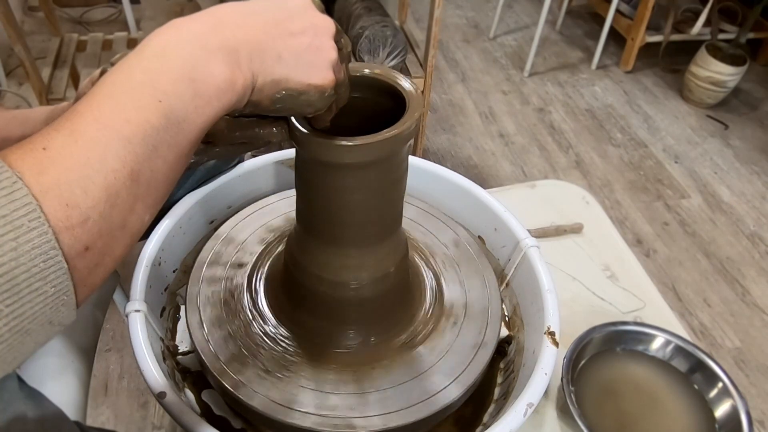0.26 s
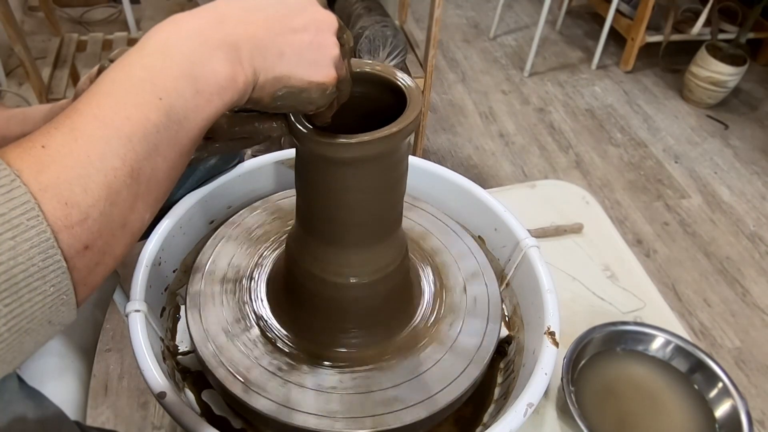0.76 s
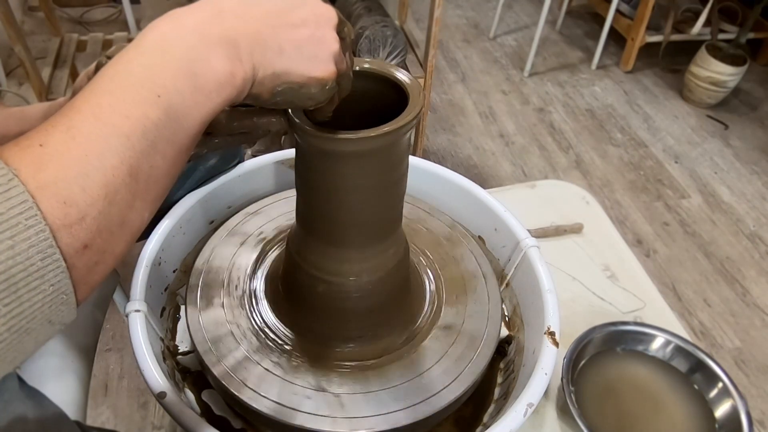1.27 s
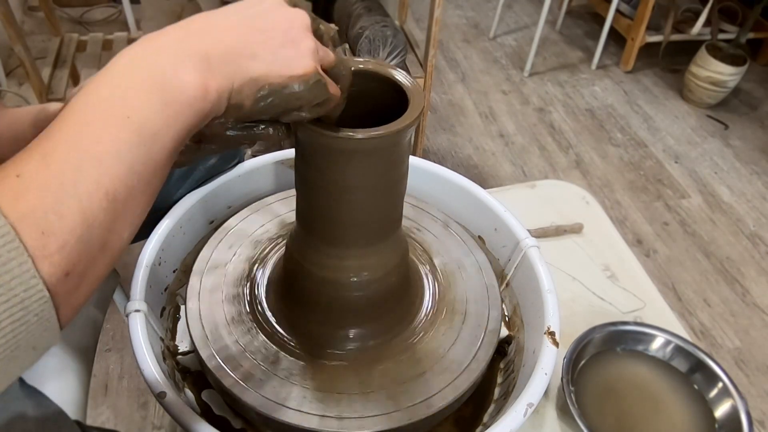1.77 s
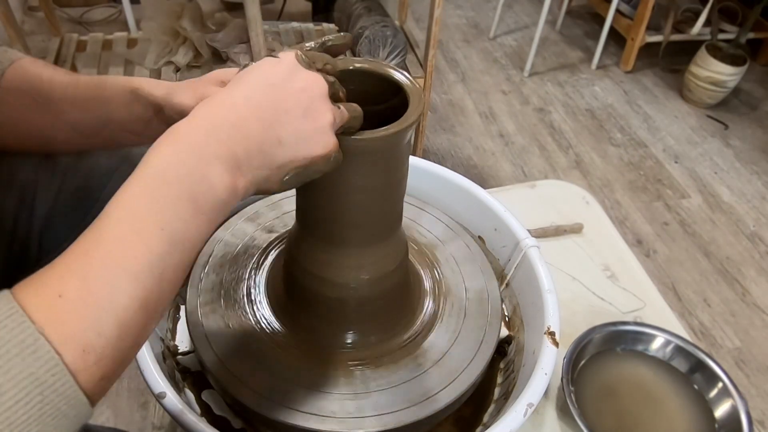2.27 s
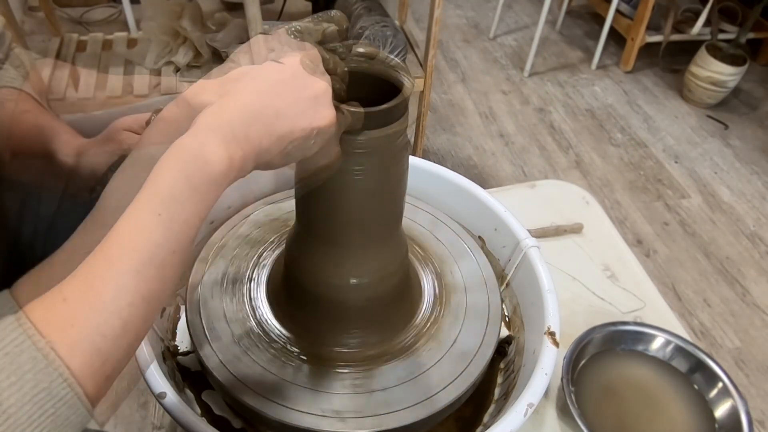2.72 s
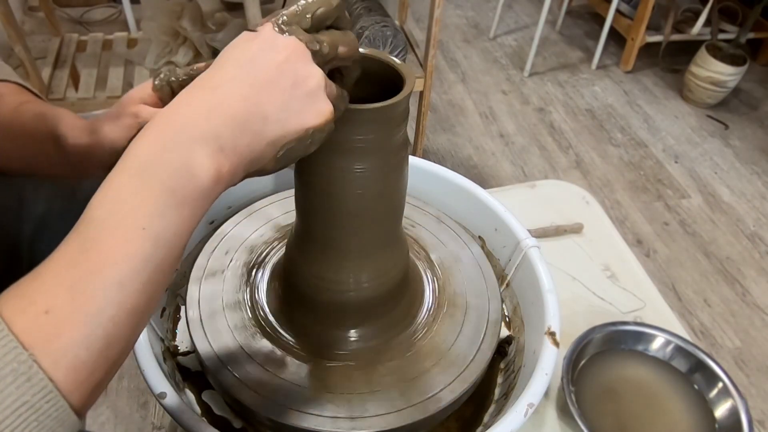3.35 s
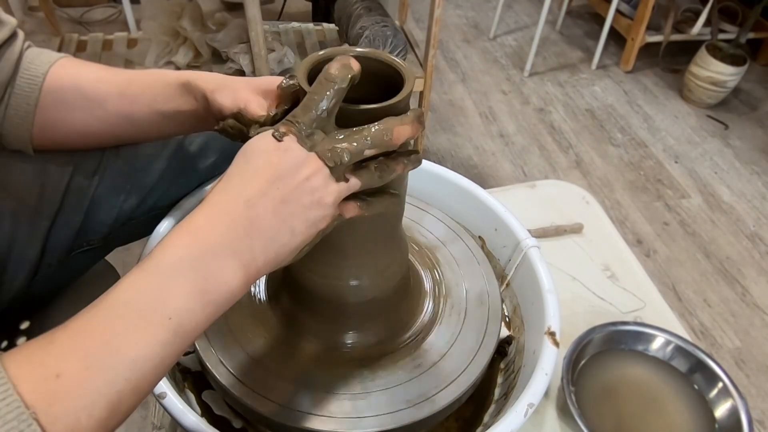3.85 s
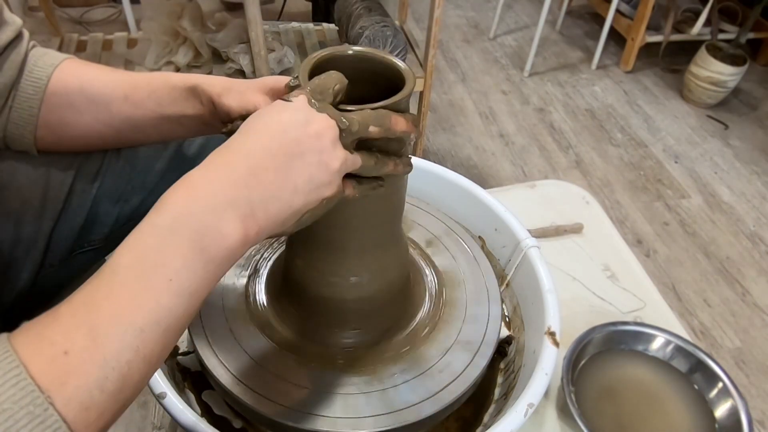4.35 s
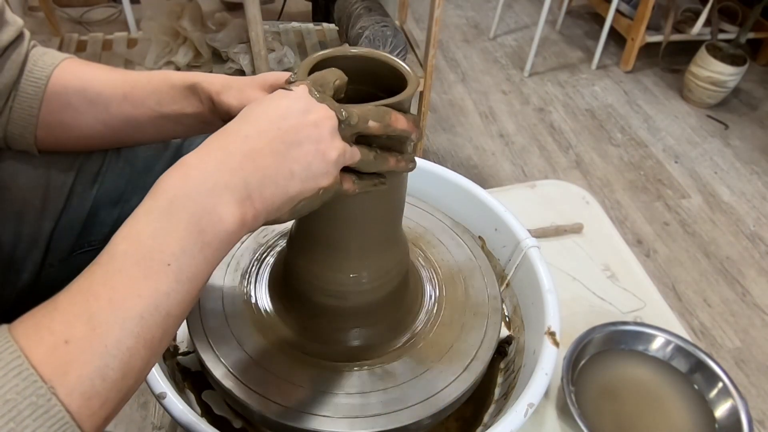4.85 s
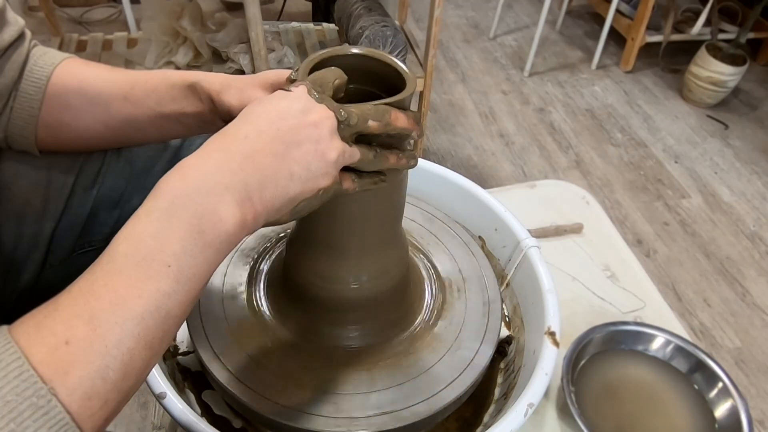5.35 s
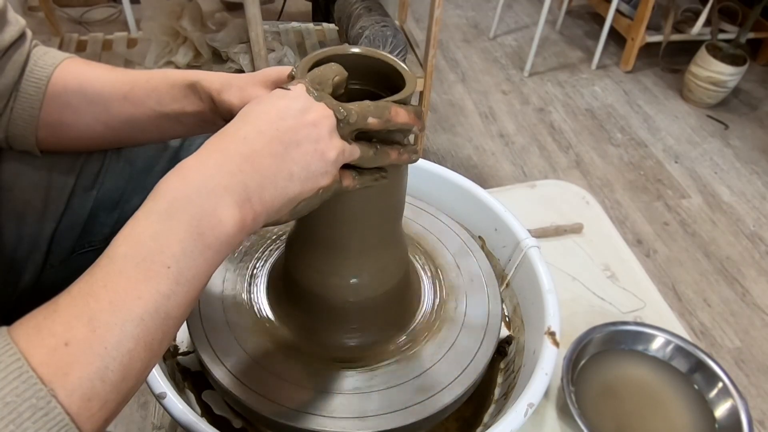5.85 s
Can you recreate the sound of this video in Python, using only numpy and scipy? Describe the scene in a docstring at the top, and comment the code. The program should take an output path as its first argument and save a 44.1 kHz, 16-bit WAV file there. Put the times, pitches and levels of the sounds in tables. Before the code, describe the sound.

An electric pottery wheel hums and rumbles low; a broad rush stops abruptly partway, leaving wet fingers softly squelching and sliding on clay.

```python
"""Electric pottery wheel in a workshop

The drive throbs, hums and whines as wavering tones; the controller whistles; noise through resonances rumbles.
Wet fingers slide and squelch on the clay, a sleeve brushes past, slip spatters: shaped bursts of coloured noise.
Partway through, a broad rush stops at once; throb and hum sound slightly higher and the tones rebalance."""
import sys
import numpy as np
from scipy import signal
from scipy.fft import rfft, irfft
from scipy.io import wavfile

SR = 44100
rng = np.random.default_rng(int(sys.argv[2]) if len(sys.argv) > 2 else 0)


def materialize(psi):
    """Save the field psi as 16-bit PCM at rate SR to the path in sys.argv[1].

    A 1-D psi becomes a single channel; in a 2-D psi each row is a channel.
    """
    bounded = np.clip(np.atleast_2d(psi).T, -1, 1)
    quanta = np.round(bounded * 32767).astype(np.int16)
    wavfile.write(sys.argv[1], SR, quanta)


N = 268569
TIME = np.arange(N) / SR
FREQS = np.maximum(np.arange(N // 2 + 1) * SR / N, 1)


def from_db(db):
    """Decibels to gain."""
    return 10 ** (np.asarray(db) / 20)


def rms_one(x):
    """Scale to unit power."""
    return x / np.sqrt(np.mean(np.abs(x) ** 2) + 1e-30)


def pan(db):
    """Channel gains for a level difference, left over right."""
    return from_db([[db / 2], [-db / 2]])


def colour(points):
    """Gain by frequency from (Hz, dB) rows, falling away past the ends."""
    hz, db = np.transpose(points)
    low_end = np.minimum(1, FREQS / hz[0]) ** 2
    high_end = np.minimum(1, hz[-1] / FREQS) ** 4
    return from_db(np.interp(np.log(FREQS), np.log(hz), db)) * low_end * high_end


def resonance(hz, width_hz, order=1):
    """Gain by frequency of a resonance, steeper with each order; unit power."""
    detuning = (FREQS ** 2 - hz ** 2) / (FREQS * width_hz * np.pi / 2)
    return rms_one(1 / (1 + detuning ** 2 / order) ** order)


def drift(rate_hz):
    """Random wander below a corner rate, rms 1."""
    lowpass = 1 / (1 + (FREQS / rate_hz) ** 4)
    return rms_one(irfft(rfft(rng.standard_normal(N)) * lowpass, N))


# Likeness of the two channels. Each row: frequency in Hz, correlation.
LIKENESS_BY_HZ = [(60, 0.91), (250, 0.99), (450, 0.93), (800, 0.27), (1600, 0.39), (2800, 0.53),
                  (4200, 0.57), (6000, 0), (9000, 0)]


def noise(gain):
    """Stereo noise of a given colour, alike in the bass and diffuse in the treble; rms 1."""
    hz, alike = np.transpose(LIKENESS_BY_HZ)
    alike = np.clip(np.interp(np.log(FREQS), np.log(hz), alike), -.99, .998)
    mid, side = rfft(rng.standard_normal((2, N))) * gain
    spectrum = np.sqrt(1 + alike) * mid + np.sqrt(1 - alike) * side * [[1], [-1]]
    return rms_one(irfft(spectrum, N))


def resonant_noise(spectrum, db, peaks):
    """Broad noise at a given level with resonances standing out of it."""
    ringing = sum((from_db(peak_db) * resonance(hz, width)) ** 2 for hz, width, peak_db in peaks)
    power = ringing + (from_db(db) * rms_one(colour(spectrum))) ** 2
    return np.sqrt(np.mean(power)) * noise(np.sqrt(power))


def tone(hz, unsteady, lead_rad=0):
    """A line of unit power whose strength and phase waver; the left channel leads."""
    phase = 2 * np.pi * (np.cumsum(hz * np.ones(N)) / SR + rng.random())
    waver = rms_one(1 + unsteady * (drift(2.8) + 1j * drift(2.85)))
    lead = np.exp(1j * lead_rad * np.array([[1], [0]]))
    return np.sqrt(2) * np.real(waver * np.exp(1j * phase) * lead)


def burst(start, rise_s, decay_s):
    """A quick swell that dies exponentially."""
    age = np.maximum(TIME - start, 0)
    return (1 - np.exp(-age / rise_s)) * np.exp(-age / decay_s)


def stroke(start, hold_s, attack_s, release_s, sag_db_per_s):
    """Swells tenfold over the attack before start, sags while held, falls tenfold over the release."""
    age = TIME - start
    outside = np.maximum(-age, 0) / attack_s + np.maximum(age - hold_s, 0) / release_s
    return from_db(-20 * outside - sag_db_per_s * np.clip(age, 0, hold_s))


GRIT_PER_S, GRIT_SPREAD_DB = 340, 3


def grit(gain):
    """Tiny catches of a rubbed surface as random coloured clicks; rms 1."""
    sizes = from_db(GRIT_SPREAD_DB * np.minimum(rng.exponential(1, N), 3))
    signed_sizes = sizes * rng.choice([-1, 1], N)
    catches = signed_sizes * (rng.random(N) < GRIT_PER_S / SR)
    return rms_one(irfft(rfft(catches) * gain, N))


# Colour of the rush. Each row: frequency in Hz, relative level in dB.
RUSH_COLOUR = [(120, -6), (250, 2), (400, -1), (560, -6), (880, -8), (1200, -10.5), (1700, -14.5),
               (2600, -19.5), (4500, -31.5), (7000, -42), (10000, -50.5), (12000, -64.5)]
# Resonances in the rush. Each row: frequency in Hz, width in Hz, level in dB.
RUSH_RESONANCES = [(362, 2.6, -63.5), (409, 34, -65.5), (1038, 45, -61.5), (1584, 57, -70.5),
                   (2082, 55, -72.5)]


def rush(after):
    """Broad noise with a few resonances, silent after the change."""
    return (1 - after) * resonant_noise(RUSH_COLOUR, db=-53, peaks=RUSH_RESONANCES)


# Colour of brushing cloth. Each row: frequency in Hz, relative level in dB.
SLEEVE_COLOUR = [(1500, -20), (3500, -0.5), (5200, -1.5), (7300, 0.5), (9500, -13), (12000, -24),
                 (14000, -26.5)]
# Arm moves. Each row: time of full swell in seconds, hold in seconds,
# level in dB before grit and flicker, attack in seconds.
SLEEVE_BRUSHES = [(1.16, .4, -82, .1), (2.284, .13, -65.5, .22), (3.685, 0.23, -76, 0.92)]
SLEEVE_RELEASE_S, SLEEVE_SAG_DB_PER_S = 0.14, 1.5


def sleeve():
    """Cloth hisses and catches as an arm moves; a slower move swells for longer."""
    motion = sum(from_db(db) * stroke(s, hold, attack, SLEEVE_RELEASE_S, SLEEVE_SAG_DB_PER_S)
                 for s, hold, db, attack in SLEEVE_BRUSHES)
    cloth_gain = colour(SLEEVE_COLOUR)
    cloth = noise(cloth_gain) + from_db(-10) * grit(cloth_gain)
    return motion * cloth * from_db(1.0 * drift(60))


# Slip spattering. Each row: start in seconds, crack level in dB before its envelope.
SPATTER_TICKS = [(0.6393, -47), (.6432, -50), (.654, -59), (.682, -62)]
# Colour of the spatter. Each row: frequency in Hz, relative level in dB.
SPATTER_COLOUR = [(800, -1), (1900, 8), (4500, 0.5), (7000, 0), (10000, -10), (13500, -22), (15000, -38)]


def spatter(crack_s, tail_db, tail_s, wall_hz):
    """Sharp wet ticks, each followed by the workshop's short, duller tail."""
    crack = sum(from_db(db) * burst(s, 0.00025, crack_s) for s, db in SPATTER_TICKS)
    tail_power = sum((from_db(db + tail_db) * burst(s, 0.0066, tail_s)) ** 2 for s, db in SPATTER_TICKS)
    tail = np.sqrt(tail_power) * from_db(1.8 * drift(250))
    walls = 1 / np.hypot(1, (FREQS / wall_hz) ** 2)   # reflections lose treble
    wet_gain = colour(SPATTER_COLOUR)
    return (crack * noise(wet_gain) + tail * noise(wet_gain * walls)) * pan(db=-2.0)


# Colour of sliding skin. Each row: frequency in Hz, relative level in dB.
SLIDE_COLOUR = [(700, -16), (1500, -2.5), (2500, 3.5), (4300, -4), (5600, -12), (9000, -31.5)]
# Grip changes. Each row: time of full swell in seconds, hold in seconds,
# initial level in dB before grit and unevenness.
SKIN_SLIDES = [(1.898, 0.68, -67.5)]
SLIDE_ATTACK_S, SLIDE_RELEASE_S, SLIDE_SAG_DB_PER_S = 0.09, 0.11, 7
GRIT_DB = -5.5   # relative to the sliding hiss


def skin_slide(grain_db, stick_db):
    """Wet skin sticks and slides over gritty clay as a hand changes its grip."""
    pressure = sum(from_db(db) * stroke(s, hold, SLIDE_ATTACK_S, SLIDE_RELEASE_S, SLIDE_SAG_DB_PER_S)
                   for s, hold, db in SKIN_SLIDES)
    skin_gain = colour(SLIDE_COLOUR)
    friction = noise(skin_gain) + from_db(GRIT_DB) * grit(skin_gain)
    unevenness = from_db(grain_db * drift(90) + stick_db * drift(12))
    return pressure * friction * unevenness


SQUELCH_RISE_S, SQUELCH_GLIDE_S = 0.0059, 0.034


def film(start, hz, decay_s, width_hz, glide_hz_per_s):
    """A pocket of water rings and briefly slides in pitch as the finger reshapes it."""
    shift_hz = glide_hz_per_s * np.clip(TIME - start, 0, SQUELCH_GLIDE_S)
    ringing = signal.hilbert(noise(resonance(hz, width_hz, order=2)))
    glided = ringing * np.exp(2j * np.pi * np.cumsum(shift_hz) / SR)
    return burst(start, SQUELCH_RISE_S, decay_s) * glided.real


# Water films bursting under the fingers. Each row: start in seconds, initial bubble pitch in Hz,
# level in dB before envelope and fizz, decay in seconds, width in Hz, glide in Hz per second,
# left over right in dB.
WATER_FILMS = [(2.727, 8900, -80, .025, 900, 1, -9), (2.769, 5620, -75, 0.025, 260, -1500, -2),
               (2.881, 2620, -64.5, 0.071, 560, -2500, .5), (2.985, 1680, -57, 0.038, 110, 500, 0),
               (3.18, 5500, -73.5, 0.033, 420, -2000, 5), (4.602, 3040, -58.5, 0.061, 580, 999, -1),
               (4.603, 4300, -69, .03, 1800, -3000, 0), (4.649, 5660, -69.5, 0.041, 600, -6000, 3)]
# Soft wet fingertip rubs. Each row: start in seconds, centre in Hz, level in dB before envelope and fizz.
FINGER_RUBS = [(2.56, 4900, -72), (2.95, 2300, -67), (3.79, 1950, -62), (4.38, 2520, -68),
               (5.09, 2700, -70), (5.336, 3370, -66.5), (5.58, 2500, -66.5)]
RUB_RISE_S, RUB_DECAY_S, RUB_WIDTH_HZ = 0.037, .07, 1200


def squelches(grain_db, stick_db):
    """Fizz of bubbles of many pitches, low to high, uneven as the finger sticks and slips; softer rubs."""
    fizz = from_db(grain_db * drift(220) + stick_db * drift(35))
    films = sum(from_db(db) * film(s, hz, decay, width, glide) * pan(side)
                for s, hz, db, decay, width, glide, side in WATER_FILMS)
    rubs = sum(from_db(db) * burst(s, RUB_RISE_S, RUB_DECAY_S) * noise(resonance(hz, RUB_WIDTH_HZ, order=3))
               for s, hz, db in FINGER_RUBS)
    return fizz * (films + rubs)


# Colour of the bearing hiss. Each row: frequency in Hz, relative level in dB.
BEARING_COLOUR = [(20, -25), (45, -11.5), (110, -0.5), (170, -9), (260, -15), (400, -16), (520, -20.5),
                  (660, -21), (900, -28.5), (1500, -28.5), (2300, -39.5), (3200, -45.5), (4500, -49.5),
                  (7200, -50), (10000, -62), (11500, -78)]
# Frame and splash pan resonances. Each row: frequency in Hz, width in Hz, level in dB.
FRAME_RESONANCES = [(37.4, 5.6, -50), (59, 21, -51), (86.5, 14, -49.5), (162.5, 11, -56), (206.3, 27, -57),
                    (315, 42, -60.5), (750.6, 20, -60), (637, 33, -71.5), (1666, 58, -70.5)]


def rumble():
    """Rolling bearings hiss and shake the frame and splash pan."""
    return resonant_noise(BEARING_COLOUR, db=-48, peaks=FRAME_RESONANCES)


# High lines. Each row: frequency in Hz, level in dB.
HIGH_LINES = [(6995.5, -88.5), (7031.3, -82.5), (13937, -102)]


def whistle():
    """The speed controller's steady high lines near 7 kHz, above them faint treble."""
    lines = sum(from_db(db) * tone(hz, unsteady=0.075, lead_rad=-0.91) for hz, db in HIGH_LINES)
    faint_treble = from_db(-95) * noise(resonance(hz=14200, width_hz=250, order=3))
    return lines * pan(db=1.7) + faint_treble


# Whine and sidebands. Each row: beat steps from the centre, dB before the change, dB after.
WHINE_LINES = [(-1, -66.5, -74), (0, -58, -64), (1, -71, -65), (2, -77, -72), (3, -69, -75), (5, -80, -74)]
WHINE_HZ, WHINE_BEAT_HZ = 745.1, 8.8


def whine(after):
    """Evenly spaced sidebands make the whine beat."""
    lines = sum(from_db(a + (b - a) * after)
                * tone(WHINE_HZ + k * WHINE_BEAT_HZ, unsteady=0.39, lead_rad=0.44)
                for k, a, b in WHINE_LINES)
    return lines * pan(db=-3.5)


# Motor hum. Each row: multiple of the base pitch, dB before the change, dB after.
HUM_HARMONICS = [(2, -49.5, -51), (3, -42.5, -48)]


def hum(after):
    """Motor hum harmonics, slightly higher in pitch after the change."""
    base_hz = np.interp(after, [0, 1], [49.23, 50.05])
    return sum(from_db(a + (b - a) * after) * tone(k * base_hz, unsteady=0.07)
               for k, a, b in HUM_HARMONICS)


# Shaft and bearing tones. Each row: frequency in Hz, dB before the change, dB after, unsteadiness 0-1.
SHAFT_TONES = [(57.5, -54.5, -49, .5), (63.4, -48.5, -53, 0.5), (68.75, -48.5, -49.5, 0.6),
               (86.45, -51, -43, 0.57), (108.34, -54.5, -52.5, 0.7), (202.8, -64, -59, 0.6),
               (295.8, -64.5, -63.5, 0.9), (323.4, -62, -62.5, 0.5), (429.8, -65.5, -68.5, 0.2),
               (634.6, -67.5, -68, 0.9)]


def shaft(after):
    """Wavering low tones of shaft and bearings, rebalanced at the change."""
    return sum(from_db(a + (b - a) * after) * tone(hz, shake) for hz, a, b, shake in SHAFT_TONES)


# Surging level of the deepest tone. Each row: time in seconds, level in dB before the trim.
THROB_LEVELS = [(0.0, -55), (0.22, -35), (0.3, -42.5), (1.82, -42.5), (1.87, -58), (1.97, -40), (2.71, -49),
                (2.78, -32), (2.88, -41), (2.98, -62), (3.07, -43), (3.42, -43.5), (3.66, -35.5),
                (3.72, -45), (3.82, -33), (3.89, -42.5), (4.58, -37), (4.65, -50), (4.73, -40.5),
                (4.92, -52), (4.99, -34), (5.17, -39), (5.24, -56), (5.34, -39.5), (6.0, -48), (6.05, -48)]
THROB_TRIM_DB = -0.5


def throb(after):
    """The deepest drive tone surges and sinks, a little higher in pitch after the change."""
    level = from_db(THROB_TRIM_DB + np.interp(TIME, *np.transpose(THROB_LEVELS)))
    return level * tone(np.interp(after, [0, 1], [32.0, 32.3]), unsteady=.08)


def drive(after):
    """Deep throb, shaft tones, motor hum, beating whine and high whistle."""
    return throb(after) + shaft(after) + hum(after) + whine(after) + whistle()


CHANGE_S, CHANGE_RAMP_S = 2.678, 0.0051
BALANCE_DB = -1.5   # wheel and rush, left over right


def scene():
    """The wheel, the rush that stops, and the hands."""
    after = np.clip((TIME - CHANGE_S) / CHANGE_RAMP_S + .5, 0, 1)   # 0 before the change, 1 after
    wheel = (rush(after) + rumble() + drive(after)) * pan(BALANCE_DB)
    hands = sleeve() + skin_slide(grain_db=2.2, stick_db=1.3) + squelches(grain_db=1.5, stick_db=0.7)
    drops = spatter(crack_s=.0022, tail_db=-10.5, tail_s=0.066, wall_hz=9500)
    return wheel + hands + drops


CUTOFF_HZ, OPENING_S = 14400, .004


def record(dry):
    """The sound fades in briefly and the top is cut steeply."""
    opening = np.minimum(1, TIME / OPENING_S)
    lowpass = signal.ellip(10, .1, 80, CUTOFF_HZ, fs=SR, output="sos")   # ripple and stopband in dB
    return signal.sosfilt(lowpass, dry * opening)


dry = scene()
out = record(dry)
materialize(out)
```